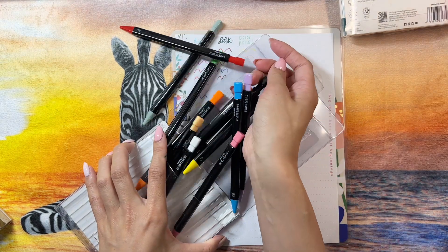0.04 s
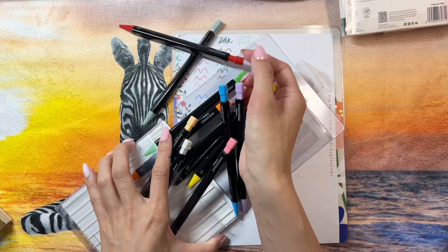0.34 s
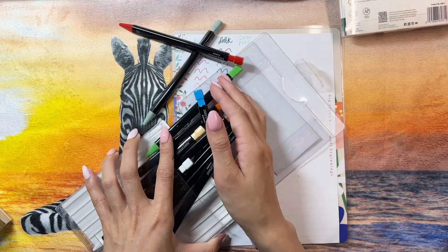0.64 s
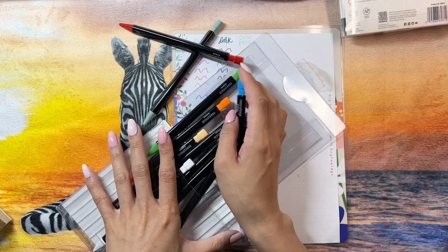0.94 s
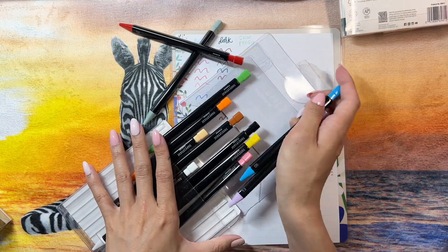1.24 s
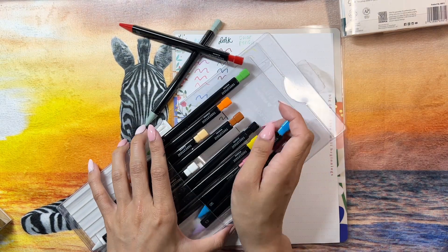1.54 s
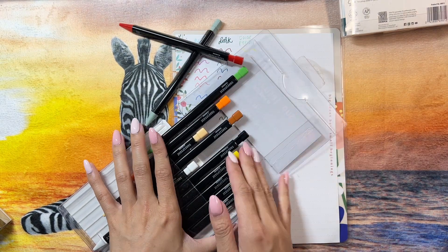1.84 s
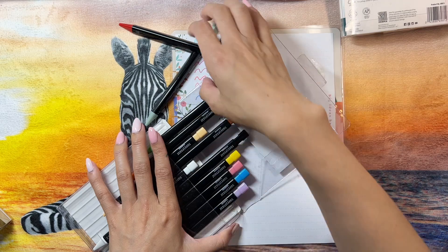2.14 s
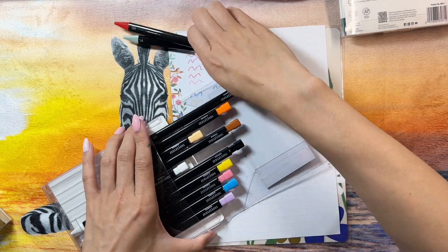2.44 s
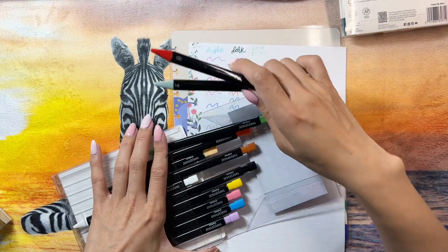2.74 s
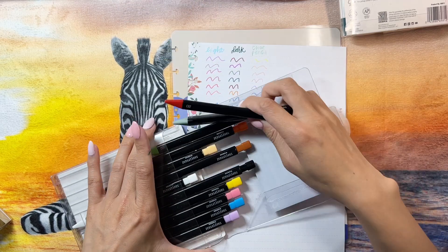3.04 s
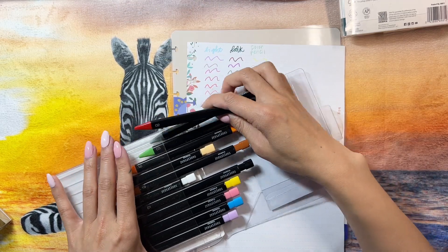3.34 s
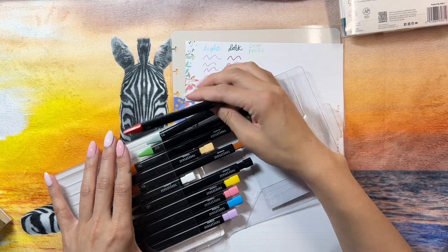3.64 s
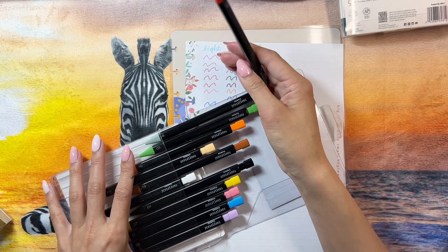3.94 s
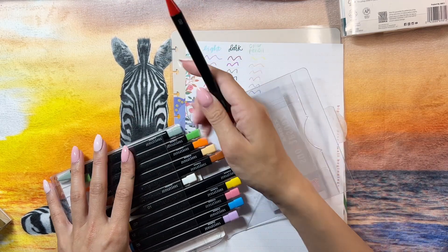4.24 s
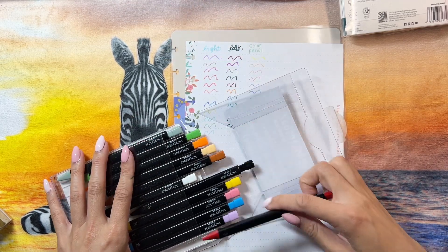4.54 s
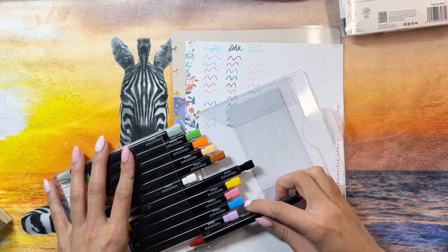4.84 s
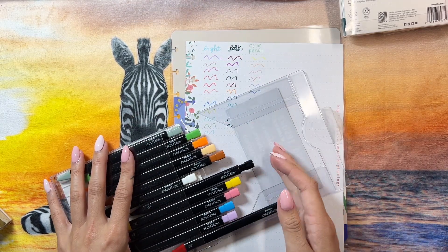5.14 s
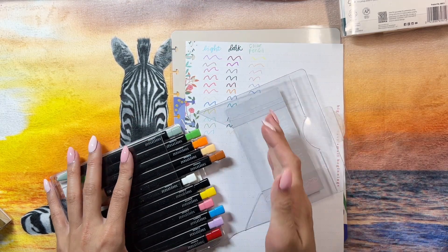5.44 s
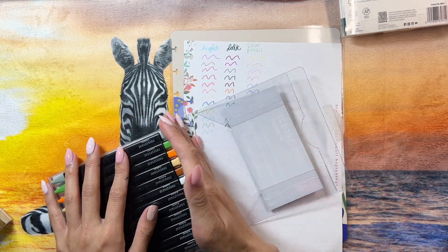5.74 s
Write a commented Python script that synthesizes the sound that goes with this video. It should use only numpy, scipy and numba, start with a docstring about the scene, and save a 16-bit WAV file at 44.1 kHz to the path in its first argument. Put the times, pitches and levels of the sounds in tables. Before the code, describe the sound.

From the start, coloured pencils are slid and dropped into a thin moulded plastic tray on a desk, close to a stereo microphone. The barrels scrape along the grooves in short, gritty strokes, brush a rustling plastic sleeve, and click unevenly against each other and the hollow tray. From about 0.5 seconds, occasional soft blows boom low in the desk top. A sharp click comes near 1 second and the loudest near 2 seconds, followed by more busy clicking and scraping, with dull thumps around 2.2 and 3 seconds. After 3.5 seconds the handling turns sparse and light, with only scattered taps and faint rubs. It picks up again from about 4.7 seconds, with a knock near 5.3, and ends on a firm click and a thump at about 5.7 seconds. The small furnished room adds a short reverberation and a very faint low background.

```python
"""Coloured pencils are slid and dropped into a thin moulded plastic tray on a desk, close to a stereo mic.
From the start barrels scrape along the grooves, brush the plastic sleeve and click on each other and
on the tray, while a small furnished room answers. From half a second on, soft blows boom in the desk top.
The loudest click lands near 2 s. After 3.5 s the handling turns sparse and light,
then picks up again and ends on a firm click and a thump at about 5.7 s."""
import sys
import numpy as np
from scipy import signal
from scipy.fft import rfft, irfft
from scipy.io import wavfile
from scipy.ndimage import uniform_filter1d
from numba import njit

SR = 44100
rng = np.random.default_rng(int(sys.argv[2]) if len(sys.argv) > 2 else 0)


def int16_out(signal):
    """Quantize to a 16-bit WAV file."""
    q = np.round(np.clip(np.atleast_2d(signal).T, -1, 1) * 32767)
    wavfile.write(sys.argv[1], SR, q.astype(np.int16))


N = 255702


def undb(db):
    """Decibels to gain."""
    return 10 ** (np.asarray(db) / 20)


def unit(x):
    """Scale to rms 1."""
    return x / np.sqrt(np.mean(x ** 2))


def seconds(length):
    """Time axis in seconds."""
    return np.arange(int(length * SR)) / SR


def fade(t, t60):
    """Exponential decay, 60 dB down at t60."""
    return np.exp(-np.log(1000) * t / t60)


def automation(points):
    """A lane of (time_s, value) points, read at every sample."""
    return np.interp(np.arange(N) / SR, *np.transpose(points))


def band(x, low_hz, high_hz, order=3):
    """Causal band-pass."""
    sos = signal.butter(order, [low_hz, high_hz], "band", fs=SR, output="sos")
    return signal.sosfilt(sos, x)


def equalise(x, points):
    """Shape a sound with an EQ curve of (freq_hz, gain_db) points."""
    hz, db = np.transpose(points)
    f = np.fft.rfftfreq(N, 1 / SR) + 1
    return irfft(rfft(x) * undb(np.interp(np.log(f), np.log(hz), db)), N)


def ring(modes, t):
    """Struck modes: a sum of decaying sines."""
    return sum(undb(db) * np.sin(2 * np.pi * hz * t) * fade(t, t60) for hz, db, t60 in modes)


def stereo_noise(samples, width):
    """White noise with a shared centre and, scaled by width, a separate part on each side."""
    noise = rng.standard_normal((3, samples))
    return (noise[0] + width * noise[1:]) / np.hypot(1, width)


def add(out, start_s, x):
    """Mix a sound in at start_s."""
    i = max(int(start_s * SR), 0)
    out[..., i:i + x.shape[-1]] += x[..., :max(N - i, 0)]


# Room tone EQ: freq_hz, gain_db
ROOM_TONE_EQ = [(15, -43.5), (25, 4.5), (137, -3.5), (180, -17.5), (591, -19), (863, -24), (2350, -34.5),
                (3340, -29), (9320, -34), (11900, -41), (16000, -36.5)]


def room_tone():
    """The still room: a faint bed of noise, mostly low end."""
    return undb(-72) * unit(equalise(stereo_noise(N, width=0.8), ROOM_TONE_EQ))


# Tone of a barrel scraping in a groove: freq_hz, gain_db
SCRAPE_EQ = [(150, -6.5), (330, -1), (600, 1.5), (850, 0.5), (1150, 2.5), (1600, -3.5), (2200, -6),
             (3000, -1), (4200, -3), (6000, -1), (8500, -7.5), (10000, -13.5), (12000, -12), (16000, -9)]


def stick_slip(grit, slips_per_s=330, scatter_db=4.5, t60=0.008):
    """Friction fires tiny bursts of very uneven size; with less grit they give way to a steady hiss."""
    sizes = undb(scatter_db * np.minimum(rng.exponential(size=N), 3))
    slips = sizes * (rng.random(N) < slips_per_s / SR)
    power = signal.lfilter([1], [1, -fade(2 / SR, t60)], slips ** 2)
    # the hand feeds energy in evenly, so a big slip is flanked by small ones
    supply = uniform_filter1d(power, size=SR // 16) + 1e-9
    envelope = np.sqrt(grit * power / supply + 1 - grit)
    return equalise(stereo_noise(N, width=0.7) * envelope, SCRAPE_EQ)


@njit
def barrel_resonance(x, hz, damping):
    """A rubbed barrel rings: a state-variable band-pass with a moving centre."""
    out = np.empty(len(x))
    band_state, low_state = 0., 0.
    for i in range(len(x)):
        g = np.tan(np.pi * hz[i] / SR)
        passed = (band_state + g * (x[i] - low_state)) / (1 + g * (g + damping))
        band_state = 2 * passed - band_state
        low_state += 2 * g * passed
        out[i] = damping * passed / np.sqrt(hz[i])
    return out


# Pencil strokes along tray and sleeve (hollow and rustle are relative to level; grit runs 0-1):
# start_s, length_s, level_db, hollow_db, rustle_db, desk_weight_db, pitch_hz, grit
PENCIL_STROKES = [(-.022, 0.11, -39.5, -11, -3.5, -46, 3200, 0.6),
                  (0.245, 0.047, -44, -3.5, -7, -43, 3190, 0.6),
                  (0.315, .09, -60, -6, -4, -49.5, 2650, 0.7), (0.436, 0.15, -52, 1, -1, -47.5, 1230, 0.7),
                  (0.609, 0.046, -42.5, 0, -1, -64, 1210, 0.7), (.68, 0.18, -54, -1, -5.5, -50.5, 2400, .9),
                  (0.895, 0.11, -51, -19, -3, -50.5, 3300, .7),
                  (0.933, 0.059, -61.5, -3, -6, -52, 1030, 0.7),
                  (1.192, 0.049, -44.5, -1.5, -5, -66, 2840, .7),
                  (1.227, 0.051, -40, -2, -7.5, -44.5, 3080, 0.5),
                  (1.329, 0.015, -42, -11, -4.5, -40, 2580, 1), (1.48, 0.054, -51, -4, -6, -53.5, 2070, .7),
                  (1.697, 0.12, -50, 0.5, -5, -52, 1210, .8), (1.78, .07, -50, 4.5, -3, -45, 1290, 0.5),
                  (1.959, 0.019, -37, -3, -5.5, -37, 1810, 1), (2.14, 0.051, -49, -2, -7, -53, 950, 0.3),
                  (2.214, .08, -49, -3, -4, -40.5, 1400, 0.6), (2.306, 0.038, -45, 0.5, -2.5, -60, 1980, 1),
                  (2.585, 0.052, -51.5, -6.5, 1.5, -46, 2410, .7),
                  (2.627, .12, -50.5, 0, -6, -53, 1900, .8),
                  (2.776, .105, -44.5, -5, -5.5, -46.5, 2100, 0.6),
                  (3.005, 0.037, -49.5, 2, -7, -40.5, 2150, 0.5),
                  (3.09, 0.051, -70, 11, 9.5, -49, 2840, .6),
                  (3.274, .13, -59.5, -1, -5.5, -61.5, 2410, 0.8),
                  (3.42, 0.05, -64.5, 8, -13, -79, 950, 0.8), (3.54, 0.038, -71, 0, -7, -70, 2410, .6),
                  (3.569, 0.036, -61.5, -3.5, -8, -66, 2410, .7),
                  (3.664, 0.059, -63.5, -5, -25, -57, 3360, .7),
                  (3.987, 0.17, -63.5, -7.5, 5, -67, 1934, 0.3),
                  (4.162, 0.027, -49, -6, -4.5, -52, 3270, .3),
                  (4.36, 0.05, -86.5, -4, 1, -67.5, 3270, 0.3),
                  (4.563, 0.043, -75, -0.5, 0.5, -82, 2330, .6),
                  (4.661, 0.17, -67.5, -2, -1, -67, 1290, .4), (4.84, .07, -56, 3.5, -3, -57, 1380, .4),
                  (4.908, 0.055, -54.5, -1.5, -8.5, -57, 3270, .4),
                  (5.222, 0.044, -54.5, -6, -5.5, -67, 3190, .2),
                  (5.259, 0.099, -54.5, -1, -0.5, -59, 3190, .2),
                  (5.337, 0.014, -48.5, -6, -8.5, -41, 3440, 0.7),
                  (5.526, 0.064, -78, 3.5, -4, -62, 2562, .5), (5.637, .05, -58, -1, -1, -53.5, 1210, 0),
                  (5.689, 0.033, -34.5, -5.5, -4.5, -40.5, 3760, 0),
                  (5.725, .04, -49, -4, -16, -41, 1640, 0.8)]
# Faint steady rub of the hand that holds the tray: time_s, level_db
HAND_RUB = [(0, -63), (1.1, -59.5), (1.44, -73), (1.6, -63.5), (1.9, -60), (2.5, -77.5), (3, -68),
            (3.25, -77), (3.72, -69.5), (3.88, -84), (4.6, -98), (4.8, -72.5), (5.15, -71), (5.5, -84),
            (5.8, -79.5)]


def sliding(wander=0.12, shifts_per_s=30):
    """Barrels scrape in the grooves and ring, the hollow tray resounds, and the thin sleeve rustles."""
    _, _, level_db, hollow_db, rustle_db, _, pitch_hz, grits = np.transpose(PENCIL_STROKES)
    stroke_power = stroke_envelopes(attack_s=0.016, release_t60=0.2) * undb(level_db)[:, None] ** 2
    hand_power = undb(automation(HAND_RUB)) ** 2
    power = stroke_power.sum(axis=0) + hand_power

    def blend(per_stroke, hand):
        """The strongest rub sets the character."""
        return (per_stroke @ stroke_power + hand * hand_power) / power

    # the point of contact shifts, so the pitch wanders
    shifts = rng.standard_normal(int(shifts_per_s * N / SR) + 2)
    drift = np.interp(np.arange(N) / SR * shifts_per_s, np.arange(len(shifts)), shifts)
    barrel_hz = blend(pitch_hz, hand=1021) * np.exp(wander * drift)
    grains = stick_slip(grit=np.clip(blend(grits, hand=0.657), 0, 1))
    barrel = unit(np.array([barrel_resonance(side, barrel_hz, damping=0.16) for side in grains]))
    rasp = unit(unit(band(grains, 690, 3100)) + undb(-3) * barrel)
    hollow = blend(undb(hollow_db), hand=undb(-1.5)) * unit(band(grains, 170, 800))
    rustle = blend(undb(rustle_db), hand=undb(-3.5)) * unit(band(grains, 3500, 17000))
    return np.sqrt(power) * (undb(2) * rasp + undb(-2) * hollow + undb(-1) * rustle)


def stroke_envelopes(attack_s, release_t60):
    """One power envelope a stroke: attack, hold, release; a longer stroke stretches the attack."""
    t = np.arange(N) / SR
    envelopes = []
    for start_s, length_s, *_ in PENCIL_STROKES:
        attack = np.clip((t - start_s) / (attack_s + 0.069 * length_s), 0, 1)
        release = fade(np.clip(t - start_s - length_s, 0, 1), release_t60)
        envelopes.append(attack * release)
    return np.array(envelopes) ** 2


# Low modes of the desk top: pitch_hz, level_db, t60_s
DESK_MODES = [(48.1, -15, 0.055), (62, 12, 0.42), (79.7, 13, 0.38), (111, 13, 0.26), (106, -21, 0.041)]


def desk_ring():
    """The desk top's impulse response, taken as the slope of its ringing modes."""
    return np.gradient(ring(DESK_MODES, seconds(0.4)))


def desk_rumble():
    """The desk top booms softly under the weight of each stroke and of the holding hand."""
    sway = signal.fftconvolve(stereo_noise(N, width=0.18), desk_ring()[None], axes=1)[:, :N]
    levelled = sway / np.sqrt(uniform_filter1d(np.mean(sway ** 2, axis=0), size=SR // 12))
    *_, weight_db, _, _ = np.transpose(PENCIL_STROKES)
    stroke_power = undb(weight_db) ** 2 @ stroke_envelopes(attack_s=0.034, release_t60=0.29)
    hand_power = undb(automation(HAND_RUB) - 4) ** 2
    return undb(-5) * levelled * np.sqrt(stroke_power + hand_power)


# Pencil hits (level is the barrel band's; the tray's knock and the contact's hardness are relative to it):
# start_s, level_db, pitch_hz, knock_db, hardness_db
PENCIL_HITS = [(0.0174, -42, 1074, -23, -3), (0.033, -42.5, 3470, -27, 2), (0.0619, -43, 2800, -12.5, -1.5),
               (0.0717, -46.5, 2830, 11, 0), (0.0898, -45, 2800, -8, 3.5), (0.1743, -54.5, 1020, -1, -11),
               (.189, -57.5, 1120, 0.5, 4), (0.2409, -41, 982, -1, -5), (0.2614, -36.5, 2900, -1, -2.5),
               (.27, -32, 3030, -13, -6), (.373, -48, 2800, -16, -4.5), (0.3969, -44, 4710, -2.5, -2),
               (0.4419, -40, 1280, -3, -12.5), (0.4757, -45.5, 2100, -7, 0.5), (0.4912, -48.5, 895, 5.5, 3),
               (0.5188, -30, 1260, -9.5, -5.5), (0.571, -39, 2940, -11.5, -2),
               (0.5922, -42, 1210, -8.5, -4.5), (0.6243, -42, 3000, -26.5, -2.5),
               (0.6494, -29.5, 1223, -8.5, -7.5), (0.7465, -47.5, 2240, -3.5, -4.5),
               (0.816, -32.5, 2060, -10.5, -3.5), (0.892, -52, 990, 6, -1), (0.9098, -46, 1300, -12.5, -3),
               (.958, -25, 2730, -19, -6), (0.9603, -28, 1066, -13, -6), (0.997, -44.5, 2440, 1.5, -7.5),
               (1.0638, -57, 1030, -3, -5), (1.1976, -52, 2660, -29, -10.5), (1.2418, -41.5, 2530, -14, 0),
               (1.2618, -32, 2620, -26, -6), (1.2777, -29, 3040, -52, -8.5), (1.286, -41.5, 2850, 0.5, -9),
               (1.321, -38, 3090, -9, -8.5), (1.355, -35, 2510, -24, -9.5),
               (1.3685, -37.5, 2930, -18, -7.5), (1.4663, -49.5, 2770, -3, -3.5),
               (1.499, -42.5, 2060, -27.5, -8.5), (1.5113, -35, 2850, -3, -5.5),
               (1.6643, -62.5, 956, 6.5, -4.5), (1.711, -39, 3030, -20, -7.5), (1.7577, -42, 1190, -4, -6),
               (1.8012, -52, 1280, -10, -1.5), (1.8143, -41, 2420, -7, -3),
               (1.8412, -38.5, 1280, -17.5, -14.5), (1.877, -41, 2100, -36, -13.5),
               (1.8849, -40, 2160, -21, -9), (1.9348, -45, 1850, -21, -7), (1.9639, -19.5, 1792, -6.5, -8),
               (2.0925, -52.5, 2020, -21, -12), (2.1401, -49, 2110, -22, -4), (2.173, -44, 840, 2.5, -7),
               (2.2462, -37.5, 956, -7, -1), (2.294, -29.5, 2030, -11, -8.5),
               (2.3117, -29.5, 5890, -21.5, 1), (2.3314, -33, 2300, -15.5, -18),
               (2.5872, -43, 2460, -26, -7.5), (2.6008, -34.5, 2140, -12, -9.5),
               (2.608, -34, 3530, -3.5, -11), (2.678, -33.5, 1784, -14, -8.5),
               (2.719, -44, 5040, -12, -3.5), (2.7768, -45, 2020, 1, -5.5), (2.7905, -39.5, 2440, -15, -10),
               (2.8185, -37, 1980, -3, -7), (2.8303, -33, 1690, -21, -6), (2.8351, -35.5, 1650, -5, -12.5),
               (2.8568, -35.5, 1900, -16.5, -5.5), (2.8782, -34, 1870, -8, -6.5),
               (3.0102, -49, 1970, -10.5, -7.5), (3.0227, -44.5, 2180, -6.5, -13.5),
               (3.0499, -37, 2190, -33, -6), (3.0963, -32, 4960, -21, -1), (3.1625, -44, 3000, -8.5, -5.5),
               (3.3025, -52.5, 4840, -9.5, -2.5), (3.3234, -39.5, 2480, -32.5, -7.5),
               (3.3335, -50.5, 2520, -33.5, -6.5), (3.3753, -42, 1170, 3, -11),
               (3.419, -41, 857, -1, -10.5), (3.5678, -47.5, 3580, -20.5, -2.5),
               (3.6525, -61.5, 2130, -38, -10.5), (3.6892, -46.5, 3360, -14.5, -4),
               (3.8063, -56.5, 4660, -4, -5.5), (4.062, -57, 1113, -0.5, -0.5),
               (4.149, -47, 2430, -26, -15), (4.189, -43, 3210, -12.5, -7),
               (4.2764, -60, 3200, -25.5, -2.5), (4.5534, -55.5, 4720, -45, -3),
               (4.6596, -41, 3610, -8.5, -5), (4.744, -41.5, 1280, -1.5, -7),
               (4.8322, -41, 1400, -6.5, -17.5), (4.9225, -40, 3480, -15.5, 0),
               (5.062, -52, 1350, -33, -11.5), (5.2981, -44.5, 1040, 0.5, -3),
               (5.345, -36.5, 3310, 1.5, -7.5), (5.3603, -36, 3710, -9, -8.5), (5.532, -61, 2614, -30, -13),
               (5.698, -32.5, 3580, -1.5, -8.5)]
# Layers of a click, one row each for knock, body, barrel, snap and tick: low_hz, high_hz, base_t60_s
CLICK_LAYERS = [(231, 610, 0.06), (574, 1542, 0.028), (1380, 3100, 0.018), (3407, 6800, 0.037),
                (7150, 15000, 0.029)]


def clicks(ring_cycles=34, partner_ratio=0.79):
    """Each contact is a hard spike and a short chatter; the two barrels that meet ring on briefly."""
    out, t = np.zeros((2, N)), seconds(0.06)
    log_centres = [np.log(low * high) / 2 for low, high, _ in CLICK_LAYERS]
    rise = 1 - np.exp(-t / 0.00088)
    spike = 1 + 1.6 * np.exp(-t / 0.00065)
    contact_gain = np.sqrt(0.007 * SR / len(t))  # gives each layer the energy of a 7 ms burst
    for start_s, level_db, pitch_hz, knock_db, hardness_db in PENCIL_HITS:
        # hollow, low and quiet hits get more body
        body_db = 1.5 + 0.29 * knock_db - np.log2(pitch_hz / 2000) - 0.28 * (level_db + 40)
        tick_db = 1.5 + 1.63 * hardness_db
        layers_db = [knock_db, body_db, 0, hardness_db, tick_db]
        stretch = 0.92 * 2 ** (knock_db / 49)  # a fuller knock chatters longer
        chatter = stereo_noise(len(t), width=0.89) * spike * rise
        crack = sum(undb(db - 1) * unit(band(chatter * fade(t, t60 * stretch), low, high))
                    for (low, high, t60), db in zip(CLICK_LAYERS, layers_db))
        ring_t60 = ring_cycles / pitch_hz
        barrels = ring([(pitch_hz, 0, ring_t60), (pitch_hz * partner_ratio, -6, ring_t60 / 2)], t) * rise
        # barrels ring as strongly as the blow is loud around their pitch, up to a ceiling
        drive_db = min(np.interp(np.log(pitch_hz), log_centres, layers_db), -0.5)
        ring_db = drive_db - 3 - 0.2 * hardness_db  # a blunt contact leaves more woody pitch
        hit = crack + undb(ring_db) * unit(barrels)
        add(out, start_s, hit * contact_gain * undb(level_db))
    return out


# Modes of the tray with its row of pencils: pitch_hz, level_db, t60_s
TRAY_MODES = [(214, 3.5, .14), (274, -11.5, 0.25), (364.2, 6.5, 0.12), (482, 5, 0.077),
              (555.8, -9.5, 0.092), (675.7, 2, 0.2), (940, 10, 0.033), (970, -7.5, 0.091),
              (1307, -2.5, 0.12), (1383, 2, .06), (1590, -4, 0.019), (1897, 11, 0.12), (2070, 9, 0.07),
              (2315, 3, 0.2), (2420, 7, 0.021), (2760, 9.5, .07), (3140, 5, 0.02), (3200, 3.5, .05)]


def tray_ring(t):
    """The tray rings along, its modes balanced a little differently on each side."""
    return np.array([ring([(hz, db + 2 * rng.standard_normal(), t60) for hz, db, t60 in TRAY_MODES], t)
                     for _ in range(2)])


def surroundings(pencils):
    """The direct sound plus the tray's ring, scatter from things on the desk, a wall and the room tail."""
    t = seconds(0.5)
    onset = np.clip(t / 0.0026 - 1, 0, 1)
    tray = tray_ring(t) * onset
    scatter = rng.standard_normal((2, len(t))) * fade(t, t60=0.084) * onset
    response = undb(-9) * unit(scatter) + undb(-11) / 3 * unit(tray)
    tail_onset = np.clip(t / 0.015 - 0.5, 0, 1)
    for low_hz, high_hz, level_db, t60, width in [
            (120, 1200, -22, 0.46, 0.7), (900, 3800, -21.5, 0.34, 0.63), (4060, 8600, -12.5, 0.26, 2)]:
        tail = stereo_noise(len(t), width) * fade(t, t60) * tail_onset
        response += band(undb(level_db) * unit(tail), low_hz, high_hz)
    reverb = signal.fftconvolve(pencils, response / np.sqrt(len(t)), axes=1)[:, :N]
    wall = np.zeros((2, N))  # a near wall returns the treble once
    add(wall, 0.0098, undb(-14) * band(pencils, 4100, 9100))
    return pencils + wall + reverb


# Soft blows that reach the desk top: start_s, level_db, push_ms
DESK_BLOWS = [(0.532, -37, 7.3), (0.64, -32.5, 8.5), (1.97, -53, 2.4), (2.176, -41, 3.1),
              (2.246, -32.5, 2.5), (2.316, -41.5, 13), (2.62, -49.5, 12), (3.038, -32.5, 3.3),
              (3.428, -44, 9.9), (3.574, -58, 7.7), (4.669, -52, 5.1), (4.972, -48.5, 7),
              (5.356, -48.5, 2.7), (5.714, -57, 2.9), (5.761, -38.5, 3)]


def desk_thumps():
    """Each soft blow sets the desk top booming; a longer push is duller."""
    out, response = np.zeros((2, N)), desk_ring()
    for start_s, level_db, push_ms in DESK_BLOWS:
        push = np.hanning(int(push_ms / 1000 * SR) + 3)
        boom = band(np.convolve(response, push), 72, 300, order=2)  # a quick blow misses the slowest sway
        add(out, start_s, boom / np.abs(boom).max() * undb(level_db - 3))
    return out


# Pan lane, following where the right hand works: time_s, left_minus_right_db
HAND_PAN = [(0, 2.3), (.8, 0), (1.27, 0.5), (1.78, -1), (1.9, -1.9), (2.3, -0.5), (2.8, -1.1), (3.2, -0.5),
            (3.6, 1.5), (4.2, 1), (4.8, 0), (5.8, 2)]


def scene():
    """The mix: panned pencils in their surroundings, over the desk's low end and the room tone."""
    air = room_tone()
    pan = undb(automation(HAND_PAN) * np.array([[1], [-1]]) / 2)
    pencils = (clicks() + sliding()) * pan
    return surroundings(pencils) + desk_rumble() + desk_thumps() + air


# The two microphone ports: freq_hz, response_db, left_minus_right_db, left_lead_rad
MIC_PORTS = [(100, 0, -2, 0.14), (280, -0.5, -3, -0.42), (720, 1, 2.5, 1.83), (1150, -1, 3.5, 0.02),
             (2000, 1, -2.5, 1.23), (3460, 0, 1.5, 2.5), (4200, 5, 2.5, 3.5), (5120, 0.5, 6, 5.5),
             (7200, -2, 3, 7.5), (9080, 4, 1, 4.5), (10200, 4.5, -2, 3.5), (11350, 5, 0.5, .5),
             (14200, 0.5, -0.5, -4), (15700, 0.5, -0.5, -8.5)]


def record(dry, narrow_above_hz=8800, top_width=0.18, low_cut_hz=39, high_cut_hz=15900):
    """Each port has its own colour and phase; the top octave narrows, and rumble and extreme top are cut."""
    f = np.fft.rfftfreq(N, 1 / SR)
    hz, *columns = np.transpose(MIC_PORTS)
    response_db, balance_db, phase = (np.interp(f, hz, column) for column in columns)
    left, right = rfft(dry)
    mid = (left + right) / 2
    side = (left - right) / 2 * np.where(f < narrow_above_hz, 1, top_width)
    port = undb(balance_db / 2) * np.exp(1j * phase / 2)
    heard = irfft(np.array([(mid + side) * port, (mid - side) / port]) * undb(response_db), N)
    low_cut = signal.butter(3, low_cut_hz, "high", fs=SR, output="sos")
    high_cut = signal.ellip(8, 0.2, 70, high_cut_hz, fs=SR, output="sos")
    return signal.sosfilt(high_cut, signal.sosfilt(low_cut, heard))


dry = scene()
out = record(dry)
int16_out(out)
```